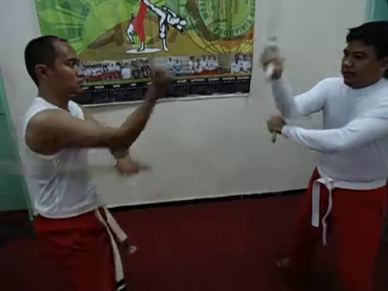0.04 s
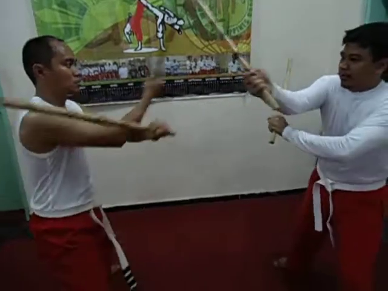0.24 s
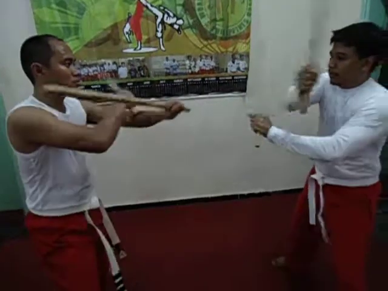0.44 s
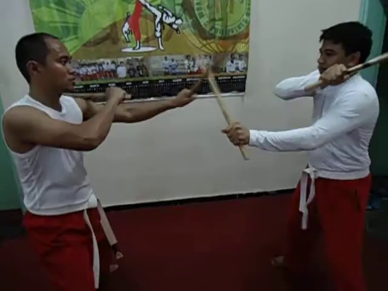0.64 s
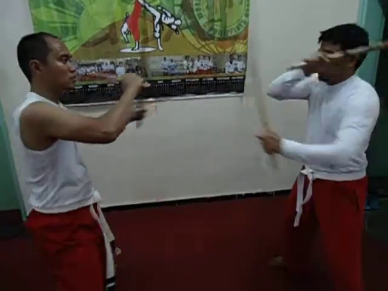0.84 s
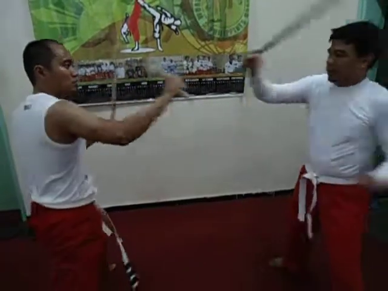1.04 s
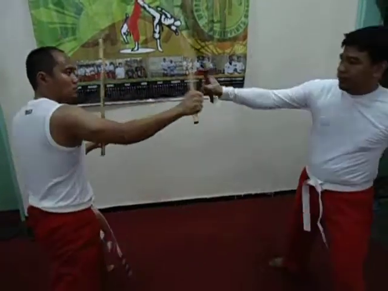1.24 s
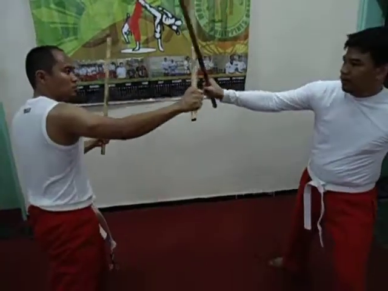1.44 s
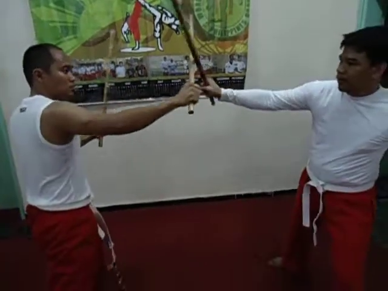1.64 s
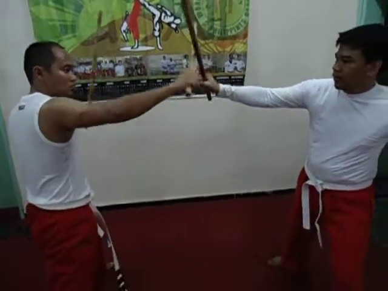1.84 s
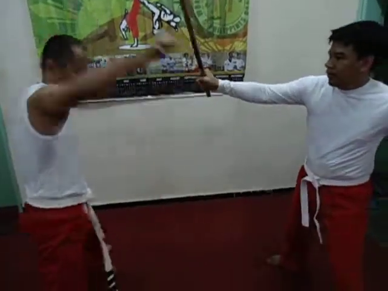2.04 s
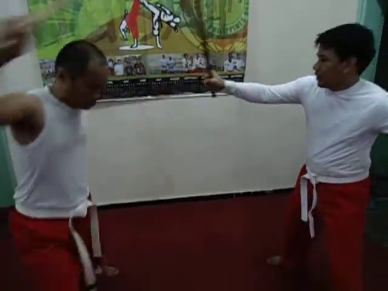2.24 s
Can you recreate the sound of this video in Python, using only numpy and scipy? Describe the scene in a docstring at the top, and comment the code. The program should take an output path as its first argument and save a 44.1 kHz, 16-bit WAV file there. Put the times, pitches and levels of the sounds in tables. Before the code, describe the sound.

Wooden sticks clack sharply together in a small, echoing gym. A loud hit lands at 0.2 seconds with a lighter rebound, followed by strikes at 0.7, 1.0 and, louder, 1.2. The locked sticks tick lightly three times around 1.5 to 1.7, then clack twice at 1.8 and 1.9, the last very loud. Faint machine hum, room noise and barely audible soft footfalls lie beneath.

```python
"""Sharp wooden clacks ring through a small, hard-walled gym as two people spar with sticks.
Each impact gives a dry contact crack and excites a stick's bending modes, which the hand damps;
wall reflections prolong it as reverberation. Between blows the locked sticks tick lightly.
A faint swish and soft footfalls on the mat lie beneath, over machine hum and room noise."""
import sys
import numpy as np
from scipy import signal
from scipy.fft import rfft, irfft
from scipy.io import wavfile
from scipy.ndimage import uniform_filter1d

SR = 44100
rng = np.random.default_rng(int(sys.argv[2]) if len(sys.argv) > 2 else 0)


def wav_out(sig):
    """Save sig, one row per channel (or a flat mono array), as 16-bit PCM at SR to the path in sys.argv[1]."""
    wavfile.write(sys.argv[1], SR, np.round(np.clip(np.atleast_2d(sig).T, -1, 1) * 32767).astype(np.int16))


N = 101429

# blows, the one at 0.3031 s being a distinct echo of the first (start_s, level_db, mode_set, ring_db,
# direct_db, bass_db, treble_db, contact_s)
BLOWS = [ (0.2017, 11, "dull", -1.5, 5, 2, -5.5, .0035), (0.2097, -0.5, "dull", 5.5, 4, -7, 4, 0.0038),
         (0.3031, -2.5, "dull", -7, 3, 5.5, -2, 0.0035), (0.6723, 6, "dry", -2, 1, -8.5, -6, 0.0022),
         (1.0108, 8.5, "light", -3.5, -11, -0.5, 0, 0.0041), (1.185, 13.5, "full", -3.5, -1, 2, 4.5, .005),
         (1.1930, 12, "full", -5, -3, -1, -6.5, 0.0042), (1.8291, 1.5, "hard", 2, -12, 0.5, -6.5, 0.0033),
         (1.8363, 6.5, "hard", -5, -11, 1, -4, 0.00418), (1.9145, 2.5, "long", 4.5, -0.5, -11.5, 0, 0.0031),
         (1.9190, 9.5, "long", 0.5, -1, -15, 8, .004), (1.9328, 15.5, "long", -7, -3.5, 0, 8, 0.0043), ]
# light touches of the locked sticks (start_s, level_db)
TOUCHES = [(1.466, -4), (1.5836, -7.5), (1.6535, -13)]
def sticks(spread_db=0.57, spread_ring_db=-3.5):
    """Direct plus reverberant sound: the direct part varies as sticks turn and bodies shadow them."""
    out = np.zeros(N)
    touches = [(start_s, level_db, "dry", -9, -1, 6, -3, 0.003) for start_s, level_db in TOUCHES]
    for start_s, level_db, mode_set, ring_db, direct_db, bass_db, treble_db, contact_s in BLOWS + touches:
        direct = clack(mode_set, ring_db, bass_db, treble_db, contact_s)
        add(out, start_s, amp(level_db + direct_db) * direct)
        # the crack spreads into the room more widely than the ring
        spread = clack(mode_set, ring_db + spread_ring_db, bass_db, treble_db, contact_s)
        add(out, start_s, reverberation(amp(level_db + spread_db) * spread))
    return out


# bending modes of each stick: mode_set -> (pitch_hz, level_db, undamped_t60_s)
BENDING_MODES = { "dull": [(585.3, -8, 0.15), (1148, -6, 0.15), (1555, -16, .08), (1683, 2.5, 0.049),
                 (2160, -6, .06), (2662, 3, .07), (3093, 2, 0.031), (3337, -4.5, 0.068),
                 (5180, -1.5, 0.019)], "dry": [(1408, -7, .06), (1870, 2.5, 0.027), (2034, -12, 0.16),
                 (2520, 8.5, 0.015), (2800, -2.5, 0.013), (3190, -9, 0.11)], "light": [(1144, -4, 0.13),
                 (1270, -7.5, 0.64), (1723, -3, 0.5), (2114, -18.5, 0.15), (3045, -3.5, 0.37),
                 (3350, -9, 0.033), (4850, -5.5, 0.15)], "full": [(915, -14, 0.25), (1168, -2.5, 0.15),
                 (1364, -10, .14), (1706, 4.5, 0.078), (1866, 4, .09), (2590, -14, 0.12), (2690, 6, 0.1),
                 (3499, -12.5, 0.1), (5210, 10, 0.02)], "hard": [(932, -17.5, .1), (1426, -22, 0.068),
                 (2190, -10.5, 0.46), (2930, -11, 0.38), (3066, -5.5, 0.053), (3660, -7.5, .13)],
                 "long": [(618, -14.5, 0.3), (1073.8, -5, 0.21), (1708, -1.5, 0.08), (2386, 5.5, 0.025),
                 (2354, 9, 0.051), (3012, 4.5, 0.045), (3090, -12.5, 0.26), (3950, -1.5, 0.027)], }
def clack(mode_set, ring_db, bass_db, treble_db, contact_s, grip_db_per_s=126, split=0.022, rise_s=0.001):
    """Impact excitation: a crack starts bending modes that decay exponentially, faster for the grip."""
    t = np.arange(SR // 2) / SR
    crack = contact_crack(contact_s, bass_db, treble_db)
    ring = np.zeros(len(t))
    for pitch_hz, level_db, undamped_t60_s in BENDING_MODES[mode_set]:
        decay = amp(level_db - (60 / undamped_t60_s + grip_db_per_s) * t)
        # uneven wood and two like sticks split each mode into close neighbours
        for ratio in (1 - split, 1, 1 + split):
            ring += decay * np.sin(2 * np.pi * (pitch_hz * ratio * t + rng.random()))
    ring *= 1 - np.exp(-t / rise_s)
    out = amp(ring_db) * ring / np.linalg.norm(ring)
    add(out, 0, crack)
    return out


# spectrum of wood striking wood (frequency_hz, gain_db)
CRACK_SPECTRUM = [(60, -32), (200, -15), (400, -17.5), (700, -8), (1100, -3), (1500, 0), (2100, -2),
                  (2800, 0.5), (3400, -2), (4000, -4), (5000, -9), (6000, -8.5)]
def contact_crack(contact_s, bass_db, treble_db, bass_hz=1004, treble_hz=3460, size=1024):
    """A brief force has a broad spectrum: milliseconds of chatter, coloured by the contact."""
    def colour_db(hz):
        bass_shelf = bass_db / (1 + (hz / bass_hz) ** 8)
        treble_shelf = treble_db / (1 + (treble_hz / (hz + 1)) ** 8)
        return read(CRACK_SPECTRUM, hz) + bass_shelf + treble_shelf

    window = 1 / (1 + (np.arange(size) / SR / contact_s) ** 8)
    chatter = rng.standard_normal(size) * window
    for _ in range(8):
        chatter = whiten(chatter) * window
    crack = signal.fftconvolve(chatter, minimum_phase(colour_db))
    return crack / np.linalg.norm(crack)


# reverberation time of the gym (frequency_hz, t60_s)
GYM_DECAY = [(150, 1), (400, 1), (900, 0.94), (2000, 0.54), (3200, 0.58), (5500, 0.46)]
def reverberation(x, gain_db=0.5, base_t60_s=0.679, rise_s=0.0084, early_db=5.5, early_fade_s=0.012):
    """Multiple reflection: strong early echoes from the near walls merge into a diffuse tail."""
    t = np.arange(32768) / SR
    early_boost = 1 + amp(early_db) * np.exp(-t / early_fade_s)
    envelope = (1 - np.exp(-t / rise_s)) * amp(-60 * t / base_t60_s) * early_boost
    tail = rng.standard_normal(len(t)) * envelope
    for _ in range(4):  # even out spectrum and decay, so that no pitch stands out
        tail = whiten(tail)
        local_rms = np.sqrt(abs(uniform_filter1d(tail ** 2, size=200)) + 1e-18)
        tail = tail * envelope / local_rms
    hz, frame_s, bands = signal.stft(tail, SR, nperseg=256)
    extra_db_per_s = 60 / read(GYM_DECAY, hz)[:, None] - 60 / base_t60_s
    tail = signal.istft(bands * amp(-extra_db_per_s * frame_s), SR, nperseg=256)[1]
    return signal.fftconvolve(x, amp(gain_db) * tail / np.linalg.norm(tail))


# swings of sticks and sleeves (fastest_s, half_length_s, level_db)
SWINGS = [(0.205, 0.15, -44.5)]
# spectrum of the rushing air (frequency_hz, relative_density_db)
SWISH_SPECTRUM = [(100, -6.5), (600, -0.5), (1400, 2), (2200, -9.5), (3500, -6), (5500, -17)]
def swishes():
    """Aerodynamic noise swells with the speed of a swing."""
    t = np.arange(N) / SR
    swell = sum(amp(level_db) * np.exp(-((t - fastest_s) / half_length_s) ** 2 / 2)
                for fastest_s, half_length_s, level_db in SWINGS)
    return noise(SWISH_SPECTRUM) * swell


# feet landing on the mat (start_s, length_s, pitch_hz, level_db)
FOOTFALLS = [(.82, 0.18, 56.3, -44), (1.08, 0.12, 164.6, -38), (2.03, .16, 192.5, -47.5)]
def footfalls():
    """A soft, slow impact excites only low frequencies: each foot gives a short boom."""
    out = np.zeros(N)
    for start_s, length_s, pitch_hz, level_db in FOOTFALLS:
        t = np.arange(0, length_s, 1 / SR)
        envelope = amp(level_db) * np.sin(np.pi * t / length_s)
        add(out, start_s, envelope * np.sin(2 * np.pi * pitch_hz * t))
    return out


# partials of the hum (pitch_hz, base_level_db, waver_depth)
HUM_PARTIALS = [(55.5, -52.5, 0.9), (115.6, -48.5, 0.11), (185.7, -62, .7)]
# gain on the whole hum, which dips twice (time_s, gain_db)
HUM_GAIN = [(0, 2), (.45, 1), (.6, -11), (.9, -1), (1.08, -11.5), (1.25, 2), (1.8, 3), (2.3, -2.5)]
def machine_hum():
    """Slow random modulation makes each low partial waver in amplitude and phase."""
    t = np.arange(N) / SR
    hum = np.zeros(N)
    for pitch_hz, base_level_db, waver_depth in HUM_PARTIALS:
        offsets_hz = rng.uniform(-5, 6, size=16)
        drift = sum(np.exp(2j * np.pi * (hz * t + rng.random())) for hz in offsets_hz) / np.sqrt(16)
        partial = (1 + waver_depth * drift) * np.exp(2j * np.pi * pitch_hz * t)
        hum += amp(base_level_db) * unit_rms(partial.real)
    return hum * amp(np.interp(t, *np.transpose(HUM_GAIN)))


# spectrum of the room noise (frequency_hz, relative_density_db)
ROOM_SPECTRUM = [(20, -15.5), (50, -9), (80, -12.5), (160, -9.5), (230, -10), (400, -11.5), (700, -18.5),
                 (1400, -24.5), (2100, -33.5), (3400, -41), (4200, -39.5), (5800, -48)]
def room_noise(level_db=-44, patch_db=3):
    """Broadband noise whose level fluctuates in small patches of time and frequency."""
    bands = signal.stft(noise(ROOM_SPECTRUM), nperseg=1024)[2]
    patches = uniform_filter1d(rng.standard_normal(bands.shape), size=8, axis=0)
    patches = unit_rms(uniform_filter1d(patches, size=8, axis=1))
    air = signal.istft(bands * amp(patch_db * patches), nperseg=1024)[1][:N]
    return amp(level_db) * unit_rms(air)


def amp(db):
    """Decibels to amplitude ratio."""
    return 10 ** (np.asarray(db) / 20)


def unit_rms(x):
    """Normalises to rms 1."""
    return x / np.sqrt(np.mean(x ** 2) + 1e-20)


def read(points, hz):
    """Interpolates a table on a log-frequency axis."""
    frequency_hz, value = np.transpose(points)
    return np.interp(np.log(hz + 1), np.log(frequency_hz + 1), value)


def add(mix, start_s, sound):
    """Superposes a sound on the mix."""
    part = mix[max(round(start_s * SR), 0):][:len(sound)]
    part += sound[:len(part)]


def whiten(x):
    """Flattens the magnitude spectrum and keeps the phase."""
    spectrum = rfft(x)
    return irfft(spectrum / (abs(spectrum) + 1e-12))


def minimum_phase(gain_db, size=4096):
    """Causal impulse response for a gain given as a function of frequency."""
    log_gain = np.log(amp(gain_db(abs(np.fft.fftfreq(size, 1 / SR)))))
    response = np.exp(np.conj(signal.hilbert(log_gain)))
    return np.fft.ifft(response).real[:size // 2]


def noise(spectrum):
    """Stationary noise of a given spectrum, rms 1."""
    gain = amp(read(spectrum, np.fft.rfftfreq(N, 1 / SR)))
    return unit_rms(irfft(rfft(rng.standard_normal(N)) * gain, N))


def lowpass(x, cutoff_hz):
    """Steep linear-phase band limit."""
    return signal.fftconvolve(x, signal.firwin(301, cutoff_hz, window=("kaiser", 9), fs=SR), "same")


def scene():
    """Superposition: all sources in the gym sum to one channel."""
    return (sticks() + swishes() + footfalls() + room_noise() + machine_hum())[None]


# frequency response of the microphone (frequency_hz, gain_db)
MIC_RESPONSE = [(20, -4), (5050, -3), (5450, -18), (5900, -20.5), (6300, -40.5)]
def record(dry, band_hz=6150, overload=0.72):
    """Band limiting and saturation: a narrow-band microphone cuts the treble and clips at overload."""
    response = minimum_phase(lambda hz: read(MIC_RESPONSE, hz))
    coloured = signal.fftconvolve(dry[0], response)[:N]
    clipped = np.clip(lowpass(coloured, band_hz), -overload, overload)
    return lowpass(clipped, cutoff_hz=15800)[None]


dry = scene()
out = record(dry)
wav_out(out)
```